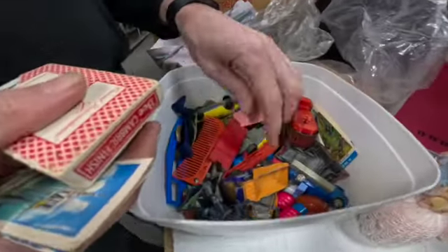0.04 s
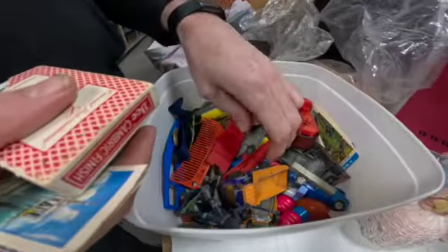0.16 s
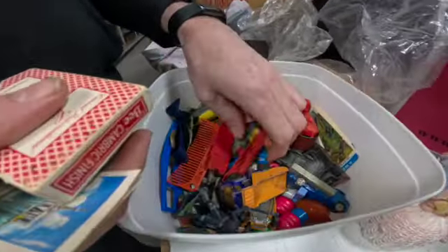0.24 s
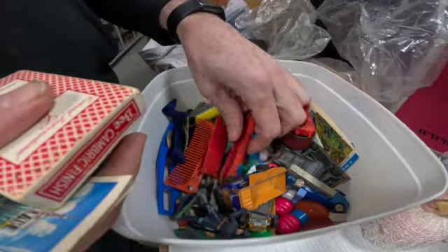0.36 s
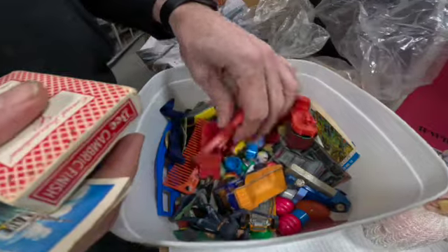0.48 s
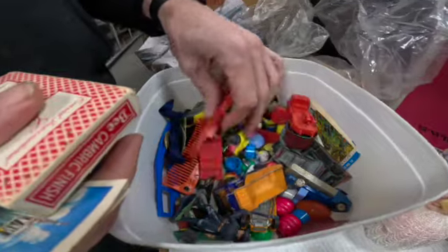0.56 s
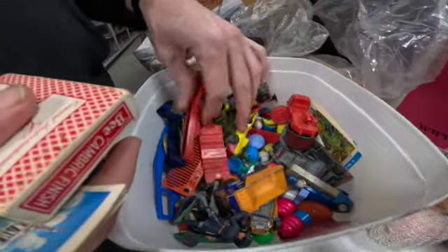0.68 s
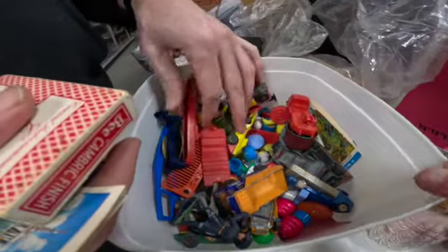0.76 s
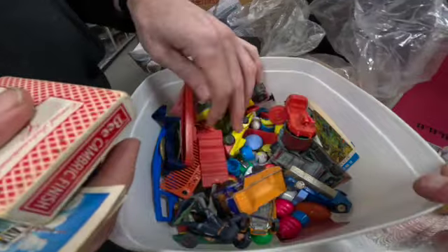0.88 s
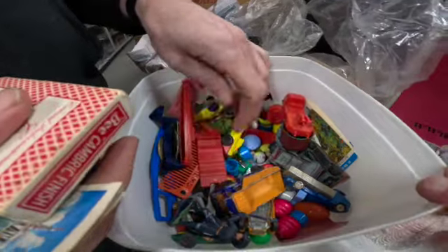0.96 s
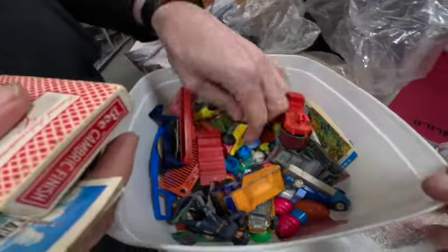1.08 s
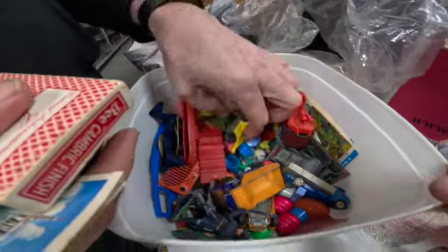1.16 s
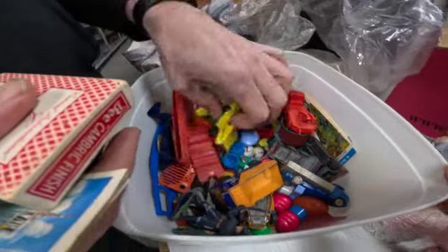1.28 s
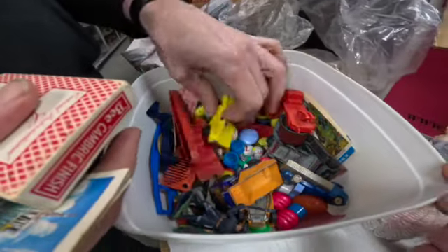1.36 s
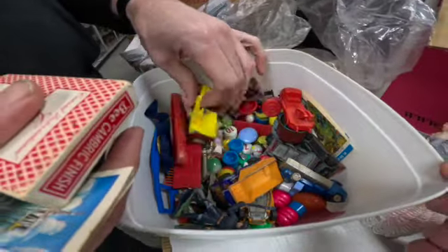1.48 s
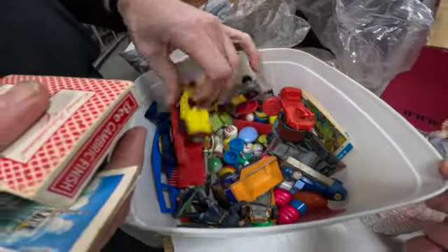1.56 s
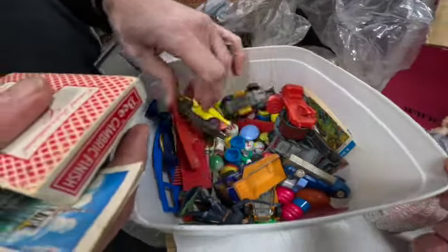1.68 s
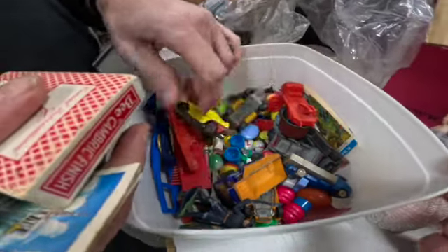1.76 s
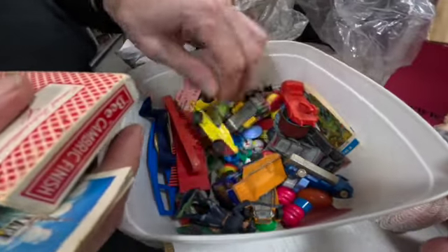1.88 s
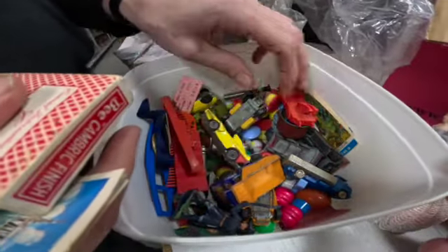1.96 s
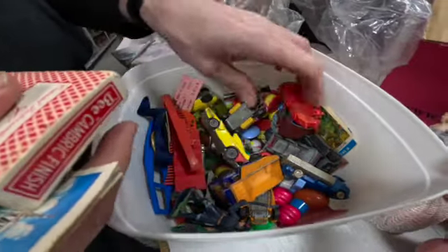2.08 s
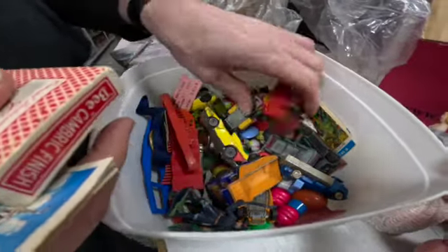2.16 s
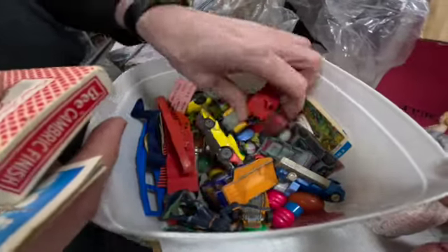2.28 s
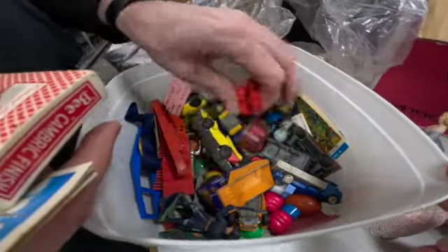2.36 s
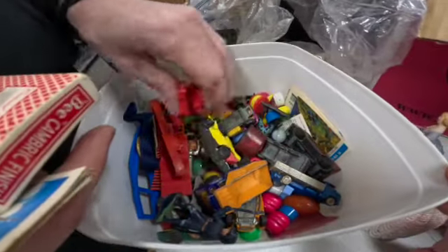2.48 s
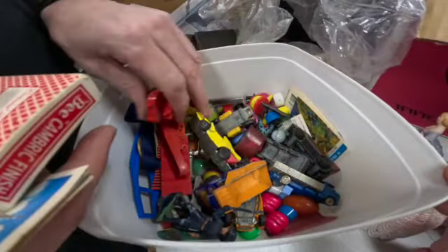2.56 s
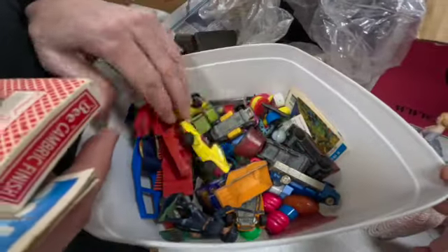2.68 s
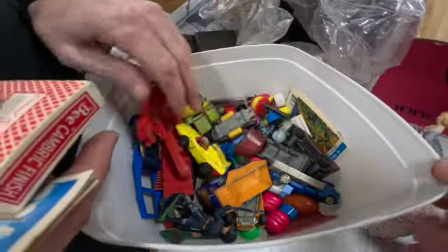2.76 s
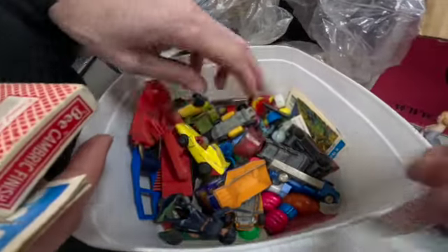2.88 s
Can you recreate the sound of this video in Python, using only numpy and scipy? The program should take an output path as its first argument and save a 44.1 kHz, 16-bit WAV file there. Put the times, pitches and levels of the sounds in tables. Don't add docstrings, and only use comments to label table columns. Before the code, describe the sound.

Plastic toys clatter in a thin tub, heard close in a dry room over faint low rumble. A light start becomes dense clacks and hollow knocks at 0.2-0.75 seconds, then thins until about 1.1. Busy rattling resumes, with a full thump near 1.55 and a sharp crack with a firm thump at 2.0. Short, muted metal car clinks mark 2.2-2.65; small ticks fade after 2.75.

```python
import sys
import numpy as np
from scipy import signal
from scipy.fft import rfft, irfft
from scipy.io import wavfile

SR = 44100
rng = np.random.default_rng(int(sys.argv[2]) if len(sys.argv) > 2 else 0)


def digitize_waveform(pressure):
    field = np.atleast_2d(pressure).T
    bounded = np.clip(field, -1, 1)
    quanta = np.round(bounded * 32767).astype(np.int16)
    wavfile.write(sys.argv[1], SR, quanta)


def elevation(decibels):
    levels = np.asarray(decibels, float)
    return 10 ** (levels / 20)


N = 130095

# frequency in Hz, level in dB.
RUMBLE_SPECTRUM = [(12, -6), (20, -1), (65, 0), (130, 1), (237, -17.5), (1250, -34.5), (5000, -51.5),
                   (6500, -102), (11000, -120)]
# frequency in Hz, level in dB per Hz.
PLASTIC_SPECTRUM = [(710, -6.5), (1200, -6), (1250, -3.5), (7570, -5.5), (12200, -20), (15000, -58)]
# frequency in Hz, left minus right in dB.
PORT_BALANCE = [(60, -1.1), (380, -3), (2380, -3), (15000, 1.5)]
# frequency in Hz, level in dB, 60 dB decay in seconds.
WALL_MODES = [(425.3, -2.5, 0.063), (539, 2, 0.044), (625.6, -4.5, 0.063), (982, -2.5, 0.058),
              (1070, 0, 0.049), (1350, 6, 0.0039), (770, -18, 0.026), (345.6, -16.5, 0.094)]
# frequency in Hz, level in dB, 60 dB decay in seconds.
FLOOR_MODES = [(108.5, -8, 0.079), (170.5, -6, 0.062)]
# frequency in Hz, level in dB, 60 dB decay in seconds.
CAR_MODES = [(1685, -1, .3), (4500, -3, .2), (4861, -7, .2), (6295, -3, .15), (7765, 0, .14),
             (9480, -12, .2), (9631, -9, .25), (10290, -11, .25), (10620, -17, .2), (11950, -14, .3),
             (13370, -24, .3), (13700, -20, .4), (14365, -21, .4)]
# start in seconds, length in seconds, rattle in dB, load on the tub in dB above the
SLIDES = [(0.021, 0.049, -51.5, 23), (0.193, 0.15, -33.5, 5.5), (0.292, 0.14, -22, 2.5),
          (0.4, 0.12, -36.5, 5.5), (0.482, 0.11, -37, 5.5), (0.578, 0.032, -32.5, 7),
          (0.636, 0.093, -36, 10), (0.722, 0.08, -40.5, 10), (0.851, 0.035, -43, 11.5),
          (0.899, 0.25, -51.5, 15), (1.086, 0.1, -35, 10.5), (1.164, 0.063, -23, 6),
          (1.232, 0.15, -31, 5.5), (1.323, 0.066, -35.5, 10.5), (1.391, 0.057, -37, 17),
          (1.48, 0.11, -28, 5.5),
          (1.576, 0.076, -30, 10), (1.689, 0.11, -36.5, 7.5), (1.8, 0.037, -40, 1.5),
               (1.84, 0.037, -26, 3.5), (1.906, 0.06, -30.5, 2.5), (1.996, 0.073, -35.5, 5),
               (2.133, 0.037, -33, 5.5), (2.204, 0.095, -24, -2.5), (2.307, 0.041, -34.5, 7),
               (2.349, 0.13, -24.5, -2), (2.457, 0.1, -36.5, 2.5), (2.578, 0.041, -27, -3.5),
               (2.642, 0.085, -36, 4), (2.733, 0.044, -45.5, 7.5), (2.804, 0.14, -51, 9.5)]
# start in seconds, peak in dB.
FLOOR_THUMPS = [
    (0.273, -30.5),
    (0.867, -33),
    (1.549, -21),
    (2.005, -25),
]
# start in seconds, peak in dB, pitch in Hz.
WALL_KNOCKS = [(0.078, -25.5, 1350), (0.261, -6, 1090), (0.312, -6, 970), (0.361, -12, 1120),
               (0.671, -14, 1060), (0.746, -9, 1120), (0.935, -21.5, 514), (1.098, -11.5, 1070),
               (1.161, -8.5, 1050), (1.216, -7.5, 950), (1.328, -7, 565), (1.404, -7.5, 615),
               (1.519, -12, 556), (1.543, -7.5, 620), (1.706, -12.5, 523), (2.004, -10.5, 396),
               (2.261, -9, 420), (2.535, -13.5, 494), (2.583, -11, 900),
               (.046, -23, 574), (.228, -28, 550), (.387, -21, 493), (0.587, -18.5, 1100),
                (.787, -18.5, 553), (.868, -20.5, 450), (1.197, -7, 970), (1.858, -20.5, 950),
                (2.048, -27, 1030), (2.317, -18, 953), (2.341, -19.5, 1020), (2.471, -12.5, 345)]
# start in seconds, peak in dB, favoured mode in Hz, seconds until muted.
CAR_STRIKES = [(1.241, -25.5, 7800, 0.0039), (1.338, -44, 7760, .03), (1.404, -23.5, 7760, 0.0062),
               (1.453, -13, 7700, .001), (2.234, -16, 7760, 0.073), (2.235, -17, 9600, 0.04),
               (2.294, -24.5, 6295, 0.049), (2.295, -28, 10100, 0.045), (2.443, -18, 1685, 0.029),
               (2.442, -13.5, 10100, 0.037), (2.444, -23, 7760, .02), (2.477, -18.5, 7760, 0.0032),
               (2.477, -22, 10040, 0.075), (2.535, -30.5, 7760, 0.026), (2.557, -38, 4500, 0.0071),
               (2.647, -15.5, 6295, 0.0094), (2.648, -22.5, 4750, 0.038), (2.648, -30, 1685, 0.015)]
# start in seconds, peak in dB, pitch in Hz.
TOY_CLACKS = [(0.2028, -27, 3900), (0.228, -11, 2200), (0.255, -15.5, 2180), (0.319, -7, 5960),
              (0.3618, -8, 3760), (0.4542, -13.5, 1920), (0.5602, -13.5, 2020), (0.5854, -9.5, 3900),
              (0.6696, -10.5, 2900), (0.6886, -6.5, 4440), (0.9302, -15, 4680), (1.1007, -22, 1990),
              (1.1753, -9, 3130), (1.2571, -11, 6570), (1.4031, -9.5, 4170), (1.454, -7, 6930),
              (1.511, -6, 3930), (1.54, -9.5, 4000), (1.705, -10.5, 6000), (1.8041, -19.5, 3760),
               (1.8372, -10.5, 3780), (1.8664, -6, 4170), (1.9121, -13.5, 5670), (2.0026, -1.5, 5030),
               (2.045, -12.5, 3530), (2.2182, -11.5, 2220), (2.233, -7.5, 7240), (2.378, -6.5, 4770),
               (2.4275, -6, 3050), (2.4727, -4, 8300), (2.5356, -11.5, 3020), (2.582, -8, 3140),
               (2.646, -17, 6000), (2.758, -25, 3150)]
# start in seconds, peak in dB, pitch in Hz.
SMALL_TICKS = [(0.2644, -12, 2950), (0.304, -19, 4160), (0.33, -9.5, 5900), (0.3717, -11.5, 3280),
               (0.4424, -14.5, 3700), (0.469, -19.5, 5840), (0.4836, -17, 2030), (0.5205, -19, 1930),
               (0.594, -14.5, 5230), (0.608, -18, 4750), (0.6634, -15, 6050), (0.7312, -22.5, 5340),
               (0.7463, -20.5, 1900), (0.771, -25.5, 2680), (0.871, -23, 3560), (0.9738, -34, 3700),
               (1.066, -31, 2050), (1.111, -19, 2190), (1.1252, -16.5, 1920), (1.183, -9.5, 2560),
               (1.2009, -13, 3760), (1.2404, -25, 7840), (1.3202, -20, 5500), (1.3388, -14, 2550),
               (1.4466, -20, 5000), (1.5934, -12.5, 3780), (1.6088, -12, 5450), (1.6518, -23, 4010),
               (1.6813, -31, 3170), (1.7236, -12.5, 6200), (1.731, -10, 2900), (1.7633, -15.5, 5800),
               (1.8452, -8.5, 3130), (1.8576, -12, 4800), (1.9265, -12.5, 5850), (1.9346, -17, 5700),
               (1.9421, -10.5, 5730), (1.9628, -22, 1970), (2.012, -6, 2530), (2.1388, -24, 2250),
               (2.1621, -16.5, 3130), (2.2796, -6, 2490), (2.293, -12, 2440), (2.4077, -6.5, 3310),
               (2.4411, -12, 2340), (2.5577, -13.5, 3060), (2.5892, -9.5, 3000), (2.605, -15.5, 3230),
               (2.6765, -13, 6150), (2.7653, -21, 2980), (2.787, -29, 2530), (2.8297, -33, 2560),
               (2.8524, -27, 2830), (2.8937, -31, 2780)]

RUMBLE_DB = -43.5
ROOM_DB, ROOM_T60_S = -16, 0.15
WIDE_DB, PORT_SCATTER_S = -19, 0.01
SLIDE_TAIL_S, SETTLE_DB, SETTLE_S = 0.014, -23.5, 0.2
SHUFFLES_PER_S, GRAIN_CYCLES, GRAIN_DB, RUB_DB = 520, 60, -2, -13
KNOCK_FALL_DB_PER_OCT, KNOCK_DB, KNOCK_CONTACT_S = 10.5, -3.5, 0.0018
OTHER_MODES_DB, FAVOUR_OCT, MUTED_S = -18, 0.12, 0.01
RISE_S = 0.0004
TOY_CYCLES, TOY_SPREAD_OCT, TOY_DB = 76, 0.54, -20.5
CRACK_DB, CRACK_S = -3.5, 0.0036
CRACK_TOP = 2.57
TICK_DB, TICK_SHARE = 1, 0.71
PAN_SPREAD_DB = 1.5
CUTOFF_HZ, LIMIT = 16300, 0.75


def rms_one(x):
    return x / np.sqrt(np.mean(x ** 2) + 1e-20)


def at_hz(points, hz):
    points_hz, points_db = np.transpose(points)
    return np.interp(np.log(hz), np.log(points_hz), points_db)


def colour(x, gain_db):
    size = 2 ** 13
    hz = np.maximum(np.arange(size // 2 + 1) * SR / size, 1)
    ceps = irfft(gain_db(hz) * np.log(10) / 20)
    ceps[1:size // 2] *= 2
    ceps[size // 2 + 1:] = 0
    response = irfft(np.exp(rfft(ceps)))[None, :size // 2]
    return signal.fftconvolve(x, response, axes=1)[:, :N]


def ring(clicks, hz, t60):
    r = elevation(-60 / (t60 * SR))
    w = 2 * np.pi * hz / SR
    return signal.lfilter([0, np.sin(w)], [1, -2 * r * np.cos(w), r * r], clicks + 1e-18)


def modes(t, hz, db, t60):
    decay = elevation(db[:, None] - 60 * t / t60[:, None])
    return (decay * np.sin(2 * np.pi * hz[:, None] * t)).sum(0)


def rise(t, contact_s):
    return 1 - np.exp(-t / contact_s)


def add(out, s, sound, pan_db):
    i = int(s * SR)
    out[:, i:i + len(sound)] += sound * elevation(np.array([[pan_db / 2], [-pan_db / 2]]))


def lumps(rate):
    r = np.exp(-2 * np.pi * rate / SR)
    noise = rng.standard_normal(N + SR)
    return rms_one(signal.lfilter([1], [1, -2 * r, r * r], noise)[SR:])


def rumble():
    air = rng.standard_normal((1, N)) + elevation(-16.5) * rng.standard_normal((2, N))
    return elevation(RUMBLE_DB) * rms_one(colour(air, lambda hz: at_hz(RUMBLE_SPECTRUM, hz)))


def room(x, t60):
    t = np.arange(SR // 4) / SR
    tails = rng.standard_normal((2, len(t))) * elevation(-60 * t / t60)
    tails /= np.sqrt((tails ** 2).sum(1, keepdims=True))
    return signal.fftconvolve(x.mean(0)[None], tails, axes=1)[:, :N]


def slide_swells():
    t, rattle, load = np.arange(N) / SR, np.zeros(N), np.zeros(N)
    for s, length, db, load_db in SLIDES:
        after = np.maximum(t - s - 0.78 * length, 0)
        settling = (length > 0.056) * elevation(SETTLE_DB) * np.exp(-after / SETTLE_S)
        swell = np.clip((t - s) / (0.25 * length), 0, 1) * (np.exp(-after / SLIDE_TAIL_S) + settling)
        rattle += elevation(db) * swell
        load += elevation(db + load_db) * swell
    return rattle, load


def toy_grains(clicks, rattle):
    toys, power = np.zeros((2, N)), 0
    for hz in np.geomspace(1300, 13500, 28):
        chance_db = 8.9 * np.clip(rng.standard_normal(N), -2, 2)
        share_db = at_hz(PLASTIC_SPECTRUM, hz) + chance_db + 2.9 * np.log2(hz / 4000)
        share = elevation(share_db) * clicks * rng.choice([-1, 1], N)
        side = elevation(PAN_SPREAD_DB * rng.standard_normal((2, 1)))
        toys += side * ring(share * rattle, hz, GRAIN_CYCLES / hz)
        power += np.mean(ring(share, hz, GRAIN_CYCLES / hz) ** 2)
    toys = signal.sosfilt(signal.butter(3, 11000, fs=SR, output="sos"), toys)
    return elevation(GRAIN_DB) * toys / np.sqrt(power)


def shuffle():
    rattle, load = slide_swells()
    sizes = elevation(5.0 * np.minimum(rng.exponential(1, N), 2.4))
    hits = rng.random(N) < SHUFFLES_PER_S * elevation(5.0 * lumps(40)) / SR
    clicks = rms_one(sizes * hits)
    toys = toy_grains(clicks, rattle)
    rough = rng.standard_normal((1, N)) * elevation(1.8 * lumps(27))
    rub = rms_one(colour(rough, lambda hz: at_hz(PLASTIC_SPECTRUM, hz)))
    push = load * (rng.standard_normal(N) * elevation(3.03 * lumps(56)) + 0.5 * clicks)
    tub = np.zeros(N)
    for hz, db, t60 in WALL_MODES:
        tub += elevation(db - 30) * ring(push * rng.choice([-1, 1], N), hz, 0.47 * t60)
    for hz, db, t60 in FLOOR_MODES:
        tub += elevation(db - 35.5) * ring(push * rng.choice([-1, 1], N), hz, t60)
    return toys + elevation(RUB_DB) * rattle * rub + tub


def thumps():
    out, t = np.zeros((2, N + SR)), np.arange(2 ** 13) / SR
    tone = modes(t, *np.transpose(FLOOR_MODES)) * rise(t, KNOCK_CONTACT_S)
    for s, db in FLOOR_THUMPS:
        add(out, s, -elevation(db + 17.0) * tone, 0)
    return out[:, :N]


def knocks():
    out, t = np.zeros((2, N + SR)), np.arange(2 ** 12) / SR
    hz, level_db, t60 = np.transpose(WALL_MODES)
    for s, db, pitch in WALL_KNOCKS:
        chance = rng.standard_normal((2, len(hz)))
        fall_db = KNOCK_FALL_DB_PER_OCT * abs(np.log2(hz / pitch))
        tone = modes(t, hz * (1 + 0.041 * chance[0]), level_db + 2.0 * chance[1] - fall_db, t60)
        add(out, s, elevation(db + KNOCK_DB) * rise(t, KNOCK_CONTACT_S) * tone, 0)
    return out[:, :N]


def car():
    out, t = np.zeros((2, N + SR)), np.arange(2 ** 13) / SR
    hz, level_db, t60 = np.transpose(CAR_MODES)
    for s, db, favoured, free in CAR_STRIKES:
        away = 1 - np.exp(-(np.log2(hz / favoured) / FAVOUR_OCT) ** 2)
        chance_db = 2.0 * rng.standard_normal(len(hz))
        tone = modes(t, hz, db + level_db + chance_db + OTHER_MODES_DB * away, t60)
        mute = np.exp(-np.maximum(t - free, 0) / MUTED_S)
        add(out, s, tone * mute * rise(t, RISE_S), 1)
    return out[:, :N]


def clacks():
    out, bright = np.zeros((2, N + SR)), np.zeros((2, N + SR))
    t = np.arange(2 ** 11) / SR
    main = np.arange(8) == 0
    hits = [(s, db, hz, 1) for s, db, hz in TOY_CLACKS]
    hits += [(s, db + TICK_DB, hz, TICK_SHARE) for s, db, hz in SMALL_TICKS]
    for s, db, hz, lasts in hits:
        chance, noise = rng.standard_normal((3, 8)), rng.standard_normal(len(t))
        pitches = np.clip(hz * 2 ** (TOY_SPREAD_OCT * chance[0] * ~main), 1300, 13000)
        tone = modes(t, pitches, 1.0 * chance[1] + 12.0 * main, lasts * TOY_CYCLES / pitches)
        noise = signal.lfilter(*signal.butter(1, min(CRACK_TOP * hz, SR / 3), fs=SR), noise)
        crack = elevation(CRACK_DB) * noise * np.exp(-t / (lasts * CRACK_S))
        pan_db = PAN_SPREAD_DB * chance[2, 0]
        add(out, s, elevation(db + TOY_DB) * rise(t, RISE_S) * tone, pan_db)
        add(bright, s, elevation(db) * rise(t, RISE_S) * crack, pan_db)
    return out[:, :N] + colour(bright[:, :N], lambda hz: at_hz(PLASTIC_SPECTRUM, hz) + 5.97)


def scene():
    tub = clacks() + knocks() + thumps() + car() + shuffle()
    background = rumble()
    wet = room(tub, ROOM_T60_S).mean(0)
    scatter = room(tub, PORT_SCATTER_S)
    wide = colour(scatter, lambda hz: WIDE_DB + 30 * np.clip(np.log2(hz / 8500), 0, 0.6))
    return tub + elevation(ROOM_DB) * wet + wide - wide.mean(0) + background


def band_limit(x):
    return signal.sosfilt(signal.butter(12, 15750, fs=SR, output="sos"), x)


def record(dry):
    left = colour(dry[[0]], lambda hz: at_hz(PORT_BALANCE, hz) / 2)
    right = colour(dry[[1]], lambda hz: -at_hz(PORT_BALANCE, hz) / 2)
    rounded = LIMIT * np.tanh(np.vstack([left, right]) / LIMIT)
    mix = signal.sosfilt(signal.cheby2(10, 50, CUTOFF_HZ, fs=SR, output="sos"), rounded)
    return band_limit(mix)


dry = scene()
out = record(dry)
digitize_waveform(out)
```